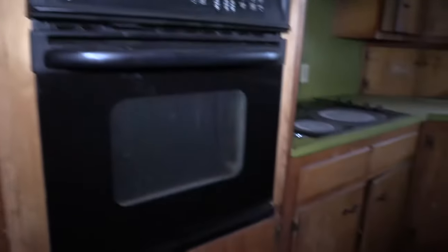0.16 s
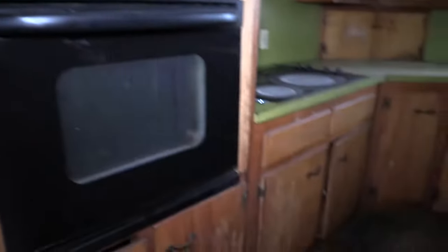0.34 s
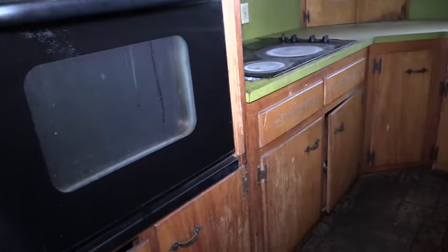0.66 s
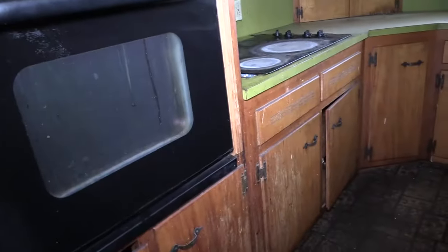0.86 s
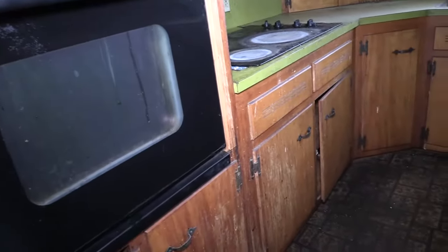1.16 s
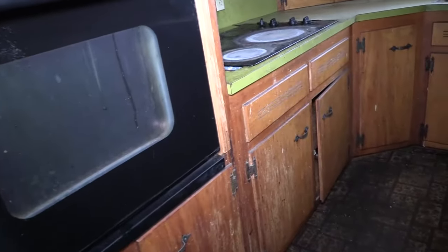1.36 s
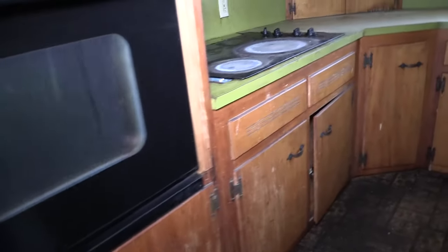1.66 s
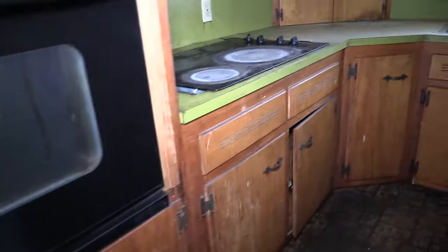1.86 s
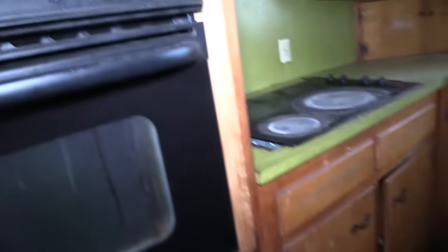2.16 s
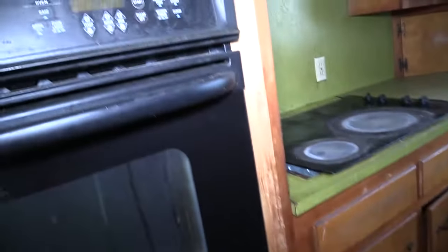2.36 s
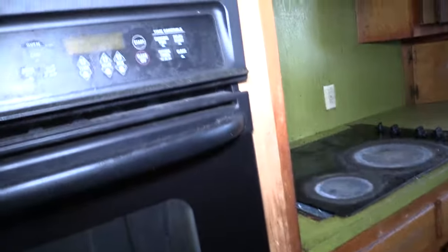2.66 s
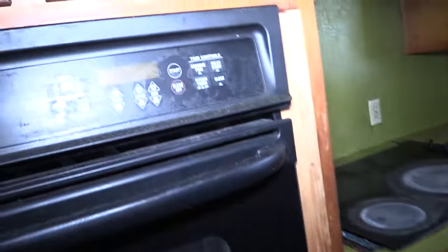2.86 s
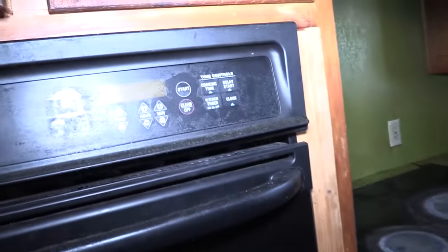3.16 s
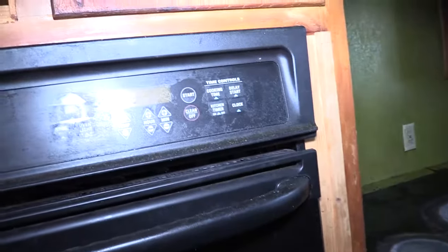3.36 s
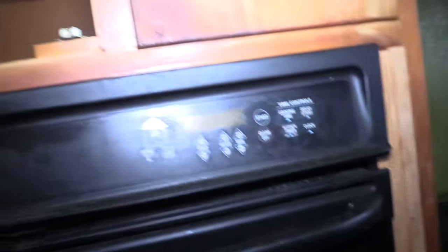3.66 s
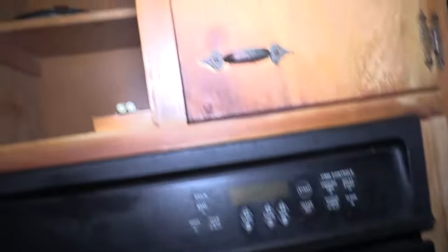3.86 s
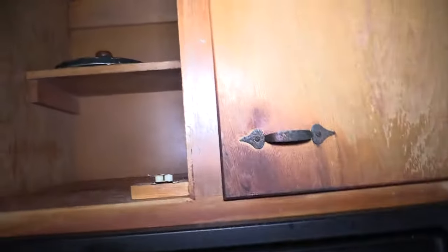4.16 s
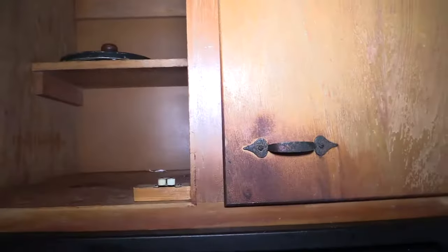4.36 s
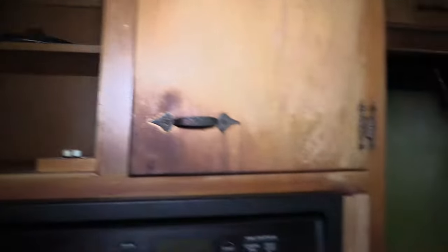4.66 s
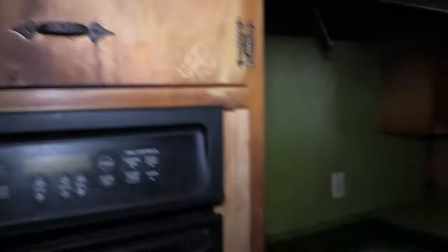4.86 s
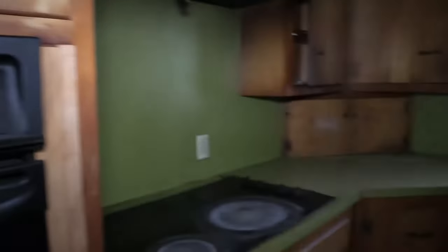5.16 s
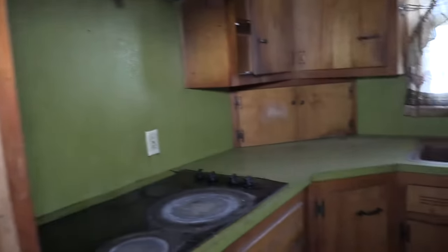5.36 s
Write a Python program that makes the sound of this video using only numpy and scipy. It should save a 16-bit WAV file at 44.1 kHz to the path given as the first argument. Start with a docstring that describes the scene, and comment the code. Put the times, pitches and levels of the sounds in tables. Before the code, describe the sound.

A loud hollow cupboard-door slam, rattling catch, light handle clicks, then a second sharper wooden slam, over faint hiss and cloth rustle in an empty kitchen.

```python
"""Cabinet doors in a kitchen

Wooden cabinet doors are pulled open and knocked shut in a bare old kitchen.
Each contact rings panel modes, chatters through frame, latch and edge bands and rattles metal modes.
Band-wise dying noise gives about half a second of echo; creaks, groans, shuffling and hiss lie beneath.
A block gain turns down whatever passes its ceiling and creeps back up."""
import sys
import numpy as np
from scipy import signal
from scipy.fft import rfft, irfft
from scipy.io import wavfile
from scipy.ndimage import uniform_filter1d

SR = 44100
rng = np.random.default_rng(int(sys.argv[2]) if len(sys.argv) > 2 else 0)


def bounce(signal):
    """Save signal as a 16-bit WAV file at the path given by the first command-line argument."""
    frames = np.transpose(np.atleast_2d(signal))
    limited = np.clip(frames, -1, 1)
    pcm = np.round(limited * 32767).astype(np.int16)
    wavfile.write(sys.argv[1], SR, pcm)


N = 242858
SECOND_DOOR_FROM_S, CLOSING_FROM_S = 2.5, 4.5
STRAY_RING_DB = -43   # metal ring over clack where no fitting is touched


# Door against frame: t/s, panel/dB, thud/dB, knock/dB, clack/dB, tick/dB, contact t60/ms, L-R/dB
SLAMS = [(1.304, 0.5, -1.5, -0.5, -19.5, -23.5, 38, 12.5), (5.283, -6.5, -38, -17, -31, -41, 77, 16),
         (5.288, 5.5, -6.5, -2, -12.5, -20, 17, 9.5)]


def slams(mix):
    """Door hits frame: hard onset, strong panel and carcass, long ring."""
    for t_s, panel_db, thud_db, knock_db, clack_db, tick_db, contact_ms, pan_db in SLAMS:
        strike(mix, t_s, panel_db, thud_db, knock_db, clack_db, clack_db + STRAY_RING_DB, tick_db,
               metal=fitting(t_s), dull_hz=960, rise_ms=1, contact_ms=contact_ms,
               echo_db=-0.7, pan_db=pan_db, ring_share=0.82, size=2 ** 14)


# Catch lets go or grips: t/s, panel/dB, thud/dB, knock/dB, clack/dB, metal ring/dB, tick/dB,
# contact t60/ms, L-R/dB, share of panel t60
CATCH_GRIPS = [(1.641, -60, -35.5, -23.5, -45, -20, -40.5, 150, 13.5, .35),
               (1.657, -32, -32, -15.5, -24, -15, -41, 22, -8, 0.29),
               (1.678, -22, -50, -21, -26, -39, -52, 28, -8, 0.26),
               (2.79, -24.5, -41, -28, -30, -24, -40, 32, 3.5, 0.82),
               (2.868, -51, -52, -37, -42, -56, -54, 96, -1, 0.36),
               (2.966, -25, -27, -23, -23.5, -18.5, -40, 31, 5, 0.24),
               (5.067, -33, -31, -20.5, -33, -15.5, -65, 42, 5, 1.3)]


def catch_grips(mix):
    """Catch lets go or grips, its spring rattling."""
    for t_s, *levels_db, contact_ms, pan_db, ring_share in CATCH_GRIPS:
        strike(mix, t_s, *levels_db, metal=fitting(t_s), dull_hz=2400, rise_ms=2.54,
               contact_ms=contact_ms, echo_db=-1, pan_db=pan_db, ring_share=ring_share)


# Small metal ring of the taps: f/Hz, level/dB, t60/s
TAP_METAL = [(1690, -23, .012), (1670, -1.5, 0.022), (1910, 7, 0.011), (2170, -5, 0.0078),
             (3150, 5, 0.0077)]
# Short hard taps: t/s, panel/dB, knock/dB, clack/dB, clack pitch factor, metal ring/dB, tick/dB,
# echo/dB, L-R/dB
TAPS = [(.271, -38, -38, -48, 1.01, -60, -38.5, 0.5, -1), (0.385, -43, -35.5, -50, 0.78, -70, -55, 5, -9),
        (2.082, -36.5, -37.5, -47, 1.01, -60, -65, -0.5, -2), (2.952, -71, -36.5, -34, 1.4, -46, -36, 8, 6),
        (3.056, -26.5, -19, -10.5, 1.23, -14.5, -27, -4.5, 7),
        (3.067, -54, -27, -47, 0.81, -21, -33, -2, -13), (3.112, -44, -26.5, -43, 1.1, -53, -34, -4.5, -1),
        (3.152, -51, -50, -29, 1.7, -55, -30, -8, 0), (3.157, -29, -28, -23, 0.75, -50, -28.5, 7.5, -2),
        (3.161, -26.5, -39, -8.5, 1.6, -34, -12, -27, 2), (3.19, -46, -49, -23, 1.2, -45, -28, -13, 0),
        (3.806, -41.5, -25, -33.5, 1.14, -59, -28.5, -12, 5),
        (4.364, -48, -35, -40, 0.62, -68.5, -56, -22, -5),
        (5.104, -48, -27.5, -20.5, 0.93, -50.5, -36, -15, -6),
        (5.189, -36, -49, -31.5, 0.91, -61, -45, -8, -0.5), (5.366, -41, -28, -37, 1.2, -56, -32, -16, 0),
        (5.489, -49, -33.5, -42, 1.2, -64, -60, 7, 7)]


def taps(mix):
    """Short hard taps and clicks, with a faint metal ring on some; near handling clicks raise little echo."""
    for t_s, panel_db, knock_db, clack_db, pitch, ring_db, tick_db, echo_db, pan_db in TAPS:
        strike(mix, t_s, panel_db, panel_db - 4.5, knock_db, clack_db, ring_db, tick_db,
               metal=TAP_METAL, dull_hz=1730, rise_ms=0.75, contact_ms=21.3,
               echo_db=echo_db, pan_db=pan_db, ring_share=0.44, clack_pitch=pitch)


# Soft scuffs and touches: t/s, panel/dB, knock/dB, clack/dB, tick/dB, rise/ms, contact t60/ms, L-R/dB
SCUFFS = [(0.336, -51, -38, -34.5, -37.5, 7, 36, 9), (.565, -64, -43, -39.5, -43, 2.4, 27, -4),
          (1.624, -47, -23, -30, -50, 30, 45.4, 2), (3.143, -24.5, -29, -43, -47, 1.8, 62, 2),
          (3.19, -43, -33, -44, -52, 3.6, 33, -2), (3.245, -34.5, -28.5, -34.5, -46, 1.7, 84, -6)]


def scuffs(mix):
    """Soft scuffs and touches, some quick, one swelling in slowly."""
    for t_s, panel_db, knock_db, clack_db, tick_db, rise_ms, contact_ms, pan_db in SCUFFS:
        strike(mix, t_s, panel_db, panel_db - 6, knock_db, clack_db, clack_db + STRAY_RING_DB, tick_db,
               metal=fitting(t_s), dull_hz=1500, rise_ms=rise_ms, contact_ms=contact_ms,
               echo_db=0.7, pan_db=pan_db, ring_share=0.71)


# Dull bumps of the loose door: t/s, panel/dB
BUMPS = [(1.012, -46), (1.844, -31.5), (1.93, -36.5), (2.131, -40.5), (4.91, -47), (5.026, -33),
         (5.057, -29.5)]
BUMP_HARD_DB = -34   # knock, clack and tick over panel


def bumps(mix):
    """Loose door bumps softly: panel and thud, almost no top."""
    for t_s, panel_db in BUMPS:
        hard_db = panel_db + BUMP_HARD_DB
        strike(mix, t_s, panel_db, panel_db + 1.5, hard_db, hard_db, hard_db + STRAY_RING_DB, hard_db,
               metal=fitting(t_s), dull_hz=770, rise_ms=9.4, contact_ms=4.3,
               echo_db=-4.5, pan_db=0, ring_share=0.38)


# Contact bands: low f/Hz, high f/Hz, share of contact t60
THUD = (69.4, 288, 9.1)     # cabinet carcass, shaken with the panel
KNOCK = (400, 2810, 1.13)   # wooden frame
CLACK = (1700, 4610, 0.53)   # latch on plate
TICK = (5520, 11350, 0.51)     # hard edge on edge
PANEL_ECHO_DB, METAL_ECHO_DB = -3.5, -11   # echo feed of panel + thud, and of metal


def strike(mix, t_s, panel_db, thud_db, knock_db, clack_db, ring_db, tick_db, metal, dull_hz,
           rise_ms, contact_ms, echo_db, pan_db, ring_share, clack_pitch=1, size=2 ** 13):
    """One contact sums panel, carcass, frame, latch, edge and metal; mix rows are left, right, echo feed."""
    t = np.arange(size) / SR
    door = np.array(panel(t_s)) * [1, 1, ring_share]
    clack_band = np.multiply(CLACK, [clack_pitch, np.sqrt(clack_pitch), 1])
    dull = signal.butter(2, dull_hz, fs=SR)   # soft blows lose 12 dB per octave
    fade = np.clip((t[-1] - t) / 0.067, 0, 1)

    def at_level(level_db, layer):
        return from_db(level_db) * peak_one(layer) * fade

    deep = at_level(panel_db, swell(t, rise_ms) * ringing(door, t, uneven_db=2.5, crowding=.06))
    deep += at_level(thud_db, chatter(THUD, t, rise_ms, contact_ms))
    ring = at_level(ring_db, rattling(metal, t, rise_ms, contact_ms))
    bright = at_level(knock_db, signal.lfilter(*dull, chatter(KNOCK, t, rise_ms, contact_ms)))
    bright += at_level(clack_db, chatter(clack_band, t, rise_ms, contact_ms))
    bright += at_level(tick_db, chatter(TICK, t, rise_ms, contact_ms))

    start = round(t_s * SR)
    span = mix[:, start:start + size]
    left_db, right_db = pan_db / 2, -pan_db / 2
    span += deep * from_db([[0], [0], [echo_db + PANEL_ECHO_DB]])   # deep layers centred
    span += bright * from_db([[left_db], [right_db], [echo_db]])
    span += ring * from_db([[left_db], [right_db], [echo_db + METAL_ECHO_DB]])


def contacts():
    """All contacts summed: direct stereo pair and mono echo feed."""
    mix = np.zeros((3, N + SR))
    for kind in (slams, catch_grips, taps, scuffs, bumps):
        kind(mix)
    return mix[:2, :N], mix[2, :N]


# Panel modes: f/Hz, level/dB, t60/s before the contact's ring share
LOW_DOOR = [(92, -12, 0.79), (128.5, -17, 0.5), (162, -7.5, 0.81), (194, -2, 0.39), (265.5, 4.5, 0.14),
            (298.2, 2, 0.57), (336.6, -3, 0.48), (437, -10, 0.99), (529, -4, 0.58), (640.5, 4, 0.094),
            (685.3, -2, 0.37), (759, -1.5, 0.5), (961, 2.5, 0.32), (1073, -5.5, 0.45)]
OPEN_DOOR = [(143.3, -2.5, 0.29), (246.5, -0.5, 0.23), (314.4, -7, 0.21), (423.3, -11.5, 0.24),
             (706, -8, .06)]   # high door, being pulled open
HELD_DOOR = [(85.6, -7.5, 0.17), (199.5, 2, 0.18), (221, -7, 0.39), (251, -2, 0.24), (396, -9, 0.18)]   # high door, under the hand as it swings to
HIGH_DOOR = [(91, -25, 0.11), (139, -3, 0.22), (152, 3, 0.31), (188, -2.5, 0.16), (248.4, 3.5, 0.22),
             (280, -6.5, 0.15), (319, -3, 0.2), (395, -6.5, 0.15), (501, -0.5, 0.26), (539, -6.5, 0.13),
             (651, -15, 0.064), (774, -6, 0.11)]   # high door, let go


def panel(t_s):
    """Modes of the door in use; a hand on the panel changes its ring."""
    if t_s < SECOND_DOOR_FROM_S:
        return LOW_DOOR
    if t_s < CLOSING_FROM_S:
        return OPEN_DOOR
    return HELD_DOOR if t_s < SLAMS[-2][0] else HIGH_DOOR


# Metal fitting modes: f/Hz, level/dB, t60/s
LOW_CATCH = [(1010, -13, .01), (1480, -8, 0.0073), (1790, 10, 0.0089), (2470, 2, 0.0093), (3070, 4, 0.022),
             (3300, -12, 0.016)]   # catch of the low door
HANDLE = [(1840, -12, .015), (2200, 1.5, 0.013), (3550, 9, 0.01), (3730, 10, 0.016), (4260, -5, 0.009),
          (4600, 1, 0.01)]         # handle of the high door
HIGH_CATCH = [(1780, -7, 0.015), (3350, 14, 0.031), (3330, 11, 0.018), (3800, 13, 0.029), (3880, -1, 0.013),
              (4350, -20, 0.01)]      # catch of the high door


def fitting(t_s):
    """Modes of the small metal part shaken at that time."""
    if t_s < SECOND_DOOR_FROM_S:
        return LOW_CATCH
    return HANDLE if t_s < CLOSING_FROM_S else HIGH_CATCH


NEIGHBOUR_DB = -6   # two weaker modes beside each mode


def ringing(modes, t, uneven_db, crowding):
    """Decaying modes start together; levels vary per blow, close neighbours blur the higher ones."""
    hz, level_db, t60_s = np.transpose(modes)[:, :, None]
    strength = from_db(level_db + uneven_db * rng.standard_normal(hz.shape))
    spread = rng.uniform(0.25, 1, (2, *hz.shape)) * [[[1]], [[-1]]]   # one above, one below
    apart_hz = crowding * hz * (hz / 1000) ** 2 * spread
    neighbours = np.sin(2 * np.pi * (hz + apart_hz) * t).sum(axis=0)
    crowd = np.sin(2 * np.pi * hz * t) + from_db(NEIGHBOUR_DB) * neighbours
    return np.sum(strength * from_db(-60 * t / t60_s) * crowd, axis=0)


SNAP = 6.2   # first touch before its rise-time loss; chatter noise = 1


def chatter(band, t, rise_ms, contact_ms):
    """A first touch, then dense dying touches, flattened in spectrum and heard through one band."""
    low_hz, high_hz, t60_share = band
    t60_ms = max(t60_share * contact_ms, 1)
    touches = rng.standard_normal(len(t)) * from_db(-60000 * t / t60_ms) * swell(t, rise_ms)
    touches[1] += SNAP * np.exp(-rise_ms / 1.19)
    spectrum = rfft(touches)
    smooth_power = uniform_filter1d(np.abs(spectrum) ** 2, size=len(t) // 320)
    touches = irfft(spectrum / np.sqrt(smooth_power), len(t))   # no broad band of pitch stands out
    return signal.sosfilt(signal.butter(3, [low_hz, high_hz], "band", fs=SR, output="sos"), touches)


FIRST_TOUCH = 3.54   # added impulse; rattle noise = 1


def rattling(metal, t, rise_ms, contact_ms):
    """Dense dying touches keep striking the metal modes."""
    decay = from_db(-60000 * t / max(contact_ms, 1))
    touches = rng.standard_normal(len(t)) * decay * swell(t, rise_ms)
    touches[1] += FIRST_TOUCH
    modes = ringing(metal, t, uneven_db=2, crowding=.002)
    return signal.fftconvolve(touches, modes)[:len(t)]


def swell(t, rise_ms):
    """Onset curve: a long rise swells, a short one snaps."""
    return (1 - np.exp(-1000 * t / max(rise_ms, .05))) ** 1.27


# Wall decay: f/Hz, t60/s
WALLS = [(60, 0.45), (160, 0.45), (420, 0.55), (1100, 0.45), (2900, 0.39), (7700, 0.35), (15000, 0.13)]
# Echo width: f/Hz, side minus mid level/dB
ECHO_WIDTH = [(60, -23), (130, -26), (290, -16), (640, -6.5), (1410, -5), (3100, -4.5), (6820, 0),
              (15000, -12)]
FIRST_ECHO_S, WALLS_BASS_HZ = 0.0081, 202   # build-up time; echo high-pass


def kitchen(feed):
    """Dense wall echoes: half-octave noise bands, each with its own decay; bass nearly mono."""
    size = 2 ** 15
    t, hz = np.arange(size) / SR, np.arange(size // 2 + 1) * SR / size
    white = rfft(coloured([(1, 0), (SR, 0)], size, ECHO_WIDTH))
    echoes = 0
    for centre_hz in 40 * 2 ** np.arange(0, 9, .5):
        octaves = np.abs(np.log2(np.maximum(hz, 1) / centre_hz))
        band = np.maximum(1 - 2 * octaves, 0)
        echoes = echoes + irfft(white * band, size) * from_db(-60 * t / at_hz(WALLS, centre_hz))
    echoes *= np.clip(t / FIRST_ECHO_S, 0, 1) ** 2
    echoes /= np.sqrt(np.sum(np.mean(echoes, axis=0) ** 2))   # unit energy of the mid
    feed = signal.lfilter(*signal.butter(1, WALLS_BASS_HZ, "high", fs=SR), feed)
    return signal.fftconvolve(feed[None], echoes, axes=1)[:, :N]


# Faint creak: t/s, peak level/dB, f/Hz, t60/s of the noise
CREAKS = [(0.27, -36, 1190, 0.19), (0.331, -40, 1140, .15)]
CREAK_WIDTH_HZ = 180


def creaks():
    """Dying noise sets one narrow resonance singing."""
    t, out = np.arange(SR // 4) / SR, np.zeros(N + SR)
    for t_s, level_db, hz, t60_s in CREAKS:
        slips = rng.standard_normal(len(t)) * from_db(-60 * t / t60_s)
        resonance = signal.iirpeak(hz, hz / CREAK_WIDTH_HZ, fs=SR)
        start = round(t_s * SR)
        out[start:start + len(t)] += from_db(level_db) * peak_one(signal.lfilter(*resonance, slips))
    return out[:N]


# Faint low hinge groan: t/s, length/s, level/dB before waver, lowest f/Hz, highest f/Hz
GROANS = [(2.65, 0.16, -50.5, 356, 406), (3.691, 0.123, -53, 377, 394)]
GROAN_ROUGH = .4   # waver depth


def groans():
    """Wavering near-tone swells and fades while its pitch arches."""
    out = np.zeros(N)
    for t_s, length_s, level_db, low_hz, high_hz in GROANS:
        arch = np.sin(np.pi * np.arange(round(length_s * SR)) / (length_s * SR))
        waver = 1 + GROAN_ROUGH * drift(36)[:len(arch)]
        tone = np.sin(2 * np.pi * np.cumsum(low_hz + (high_hz - low_hz) * arch) / SR)
        start = round(t_s * SR)
        out[start:start + len(arch)] += from_db(level_db) * np.sqrt(arch) * waver * tone
    return out


# Shuffling feet: t/s, rumble level/dB before drift
MOVING = [(0, -46), (.25, -51), (.75, -52), (.95, -49), (1.3, -50.5), (1.9, -48), (2.25, -56), (3.4, -54.5),
          (3.9, -55.5), (4.4, -56), (4.85, -56), (5.1, -50.5), (5.5, -54.5)]
# Spectra: f/Hz, relative level/dB per Hz
RUMBLE = [(24, -36), (40, -5), (161, 0), (212, 1.5), (426, 4.5), (692, -3.5), (1110, -5), (1700, -16.5),
          (3300, -120)]
RUSTLE = [(350, -23), (600, -15), (1020, 4.5), (1100, 6.5), (1240, 1), (2490, 1), (14000, -21)]
# Cloth swells: t/s, level/dB at the top before drift, half length/s
SWELLS = [(0.36, -53.5, 0.38), (0.76, -56, 0.41), (3.39, -57.5, 0.59), (4.11, -59, 0.24),
          (4.807, -52.5, 0.3), (5.5, -55, 1)]
# Width of movement and hiss: f/Hz, side minus mid level/dB
BACKGROUND_WIDTH = [(60, -9), (130, -7), (290, -6.5), (640, 6), (1410, 1.5), (3100, -4.5), (6820, -5),
                    (15000, -9.5)]
RUSTLE_DB = -6.5   # underlying rustle level over the rumble


def moving():
    """Lumpy low floor rumble; grainy cloth rustle follows it and swells now and then."""
    t = np.arange(N) / SR
    rumble_db = np.interp(t, *np.transpose(MOVING))
    cloth = from_db(rumble_db + RUSTLE_DB)
    for t_s, level_db, half_s in SWELLS:
        cloth = cloth + from_db(level_db) * np.clip(1 - np.abs(t - t_s) / half_s, 0, 1) ** 2
    rumble = from_db(rumble_db + 2.9 * drift(24.885)) * coloured(RUMBLE, N, BACKGROUND_WIDTH)
    rustle = cloth * from_db(1.64 * drift(60)) * coloured(RUSTLE, N, BACKGROUND_WIDTH)
    return rumble + rustle


# Air and recorder noise: f/Hz, relative level/dB per Hz
HISS = [(18, -38), (30, -5), (70, -12.5), (170, 0), (210, -11), (303, -12.5), (336, -21), (384, -13.5),
        (684, -11), (1010, -8), (1280, -11), (5590, -18.5), (16000, -31.5)]
HISS_DB = -52   # rms of the mid


def hiss():
    """Steady coloured stereo noise of air and recorder."""
    return from_db(HISS_DB) * coloured(HISS, N, BACKGROUND_WIDTH)


def from_db(db):
    """Decibels to amplitude factor."""
    return 10 ** (np.asarray(db) / 20)


def at_hz(points, hz):
    """Read a spectrum table on a log-frequency axis."""
    hz_points, values = np.transpose(points)
    return np.interp(np.log(np.maximum(hz, 1)), np.log(hz_points), values)


def coloured(spectrum, size, width=None):
    """Shaped noise of rms 1; with a width table, a left-right pair whose mid has rms 1."""
    hz = np.arange(size // 2 + 1) * SR / size
    mid, side = rfft(rng.standard_normal((2, size))) * from_db(at_hz(spectrum, hz))
    scale = np.std(irfft(mid, size))
    if width is None:
        return irfft(mid, size) / scale
    return irfft(mid + side * from_db(at_hz(width, hz)) * [[1], [-1]], size) / scale


def drift(rate_hz):
    """Straight lines between random knots of spread 1, rate_hz knots per second."""
    knots = rng.standard_normal(400)
    return np.interp(np.arange(N) / SR * rate_hz, np.arange(len(knots)), knots)


def peak_one(x):
    """Scale to peak 1."""
    return x / np.max(np.abs(x))


def scene():
    """Direct contacts, their echoes, creaks, groans, movement and hiss."""
    direct, feed = contacts()
    return direct + kitchen(feed) + creaks() + groans() + moving() + hiss()


BASS_CUT_HZ, STOPBAND_FROM_HZ = 52, 16000
BLOCK_S, BLOCK_START_S = .04, .033
CEILING_DB, RECOVERY_DB_S = -8, 2.1


def record(dry):
    """Block gain: a block too loud is turned down from its start, then the gain creeps back."""
    dry = signal.sosfilt(signal.butter(2, BASS_CUT_HZ, "high", fs=SR, output="sos"), dry)   # microphone
    block = ((np.arange(N) / SR - BLOCK_START_S) // BLOCK_S).astype(int) + 1
    power = np.zeros(block[-1] + 1)
    np.maximum.at(power, block, uniform_filter1d(np.mean(dry ** 2, axis=0), size=400))
    over_db = np.maximum(10 * np.log10(power + 1e-12) - CEILING_DB, 0)
    creep_db = RECOVERY_DB_S * BLOCK_S * np.arange(len(power))
    cut_db = np.maximum.accumulate(over_db + creep_db) - creep_db
    gain = uniform_filter1d(from_db(-cut_db[block]), size=60)
    low_pass = signal.cheby2(12, 60, STOPBAND_FROM_HZ, fs=SR, output="sos")
    return np.clip(signal.sosfilt(low_pass, np.clip(dry * gain, -1, 1)), -1, 1)


dry = scene()
out = record(dry)
bounce(out)
```